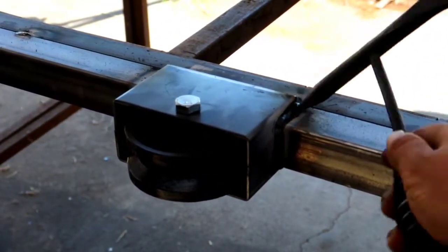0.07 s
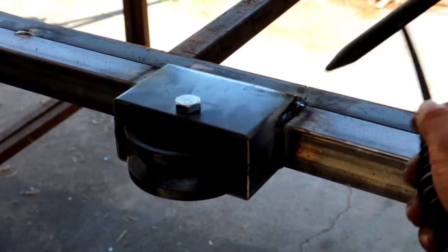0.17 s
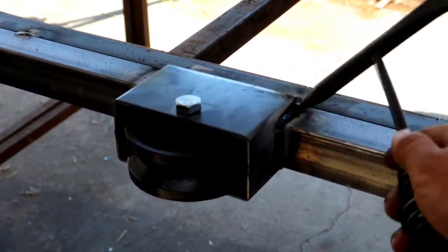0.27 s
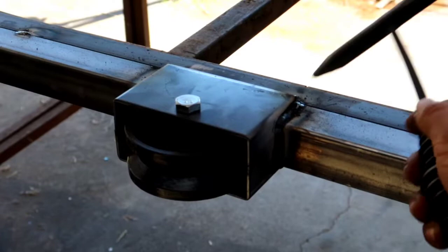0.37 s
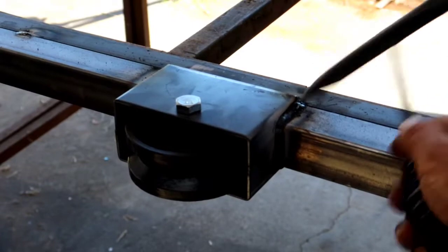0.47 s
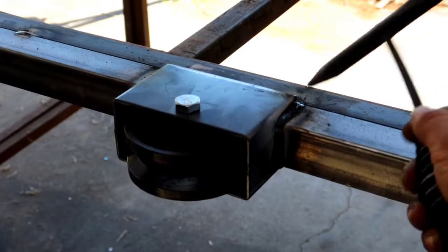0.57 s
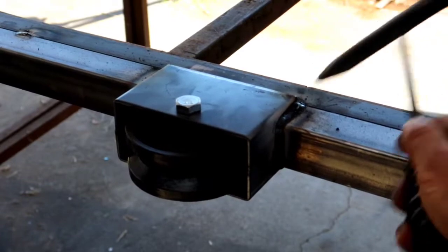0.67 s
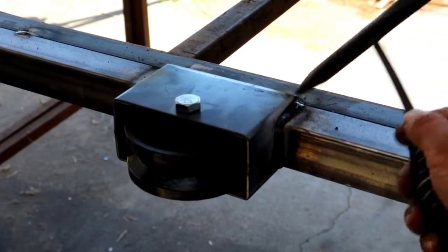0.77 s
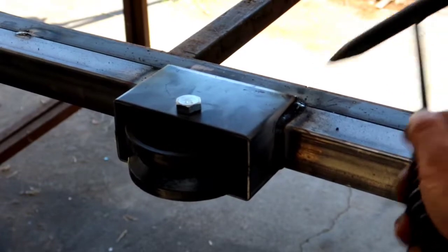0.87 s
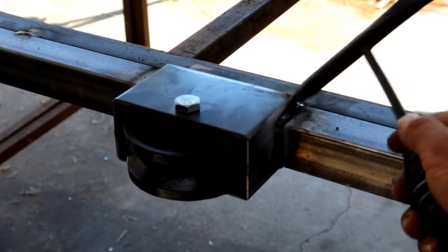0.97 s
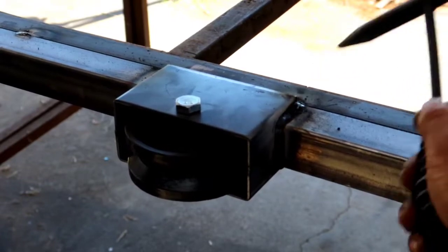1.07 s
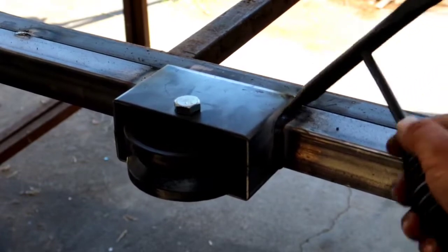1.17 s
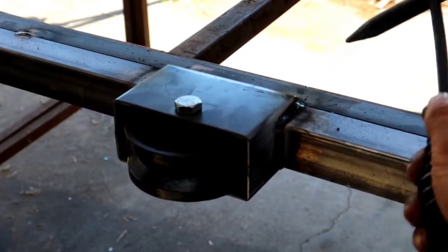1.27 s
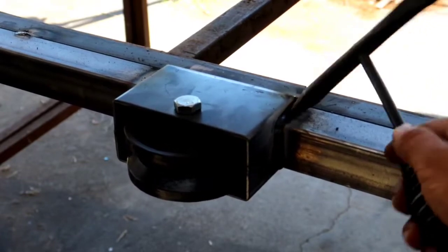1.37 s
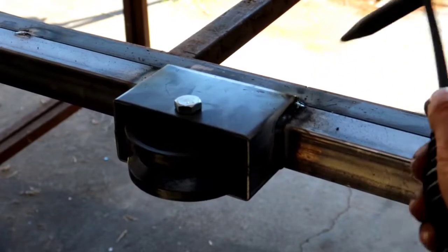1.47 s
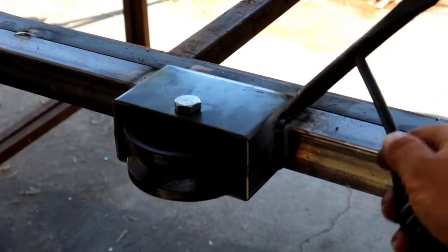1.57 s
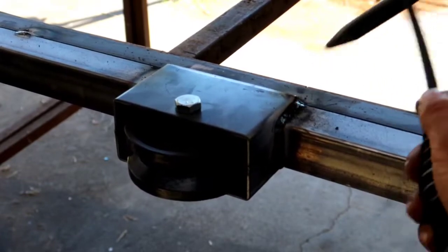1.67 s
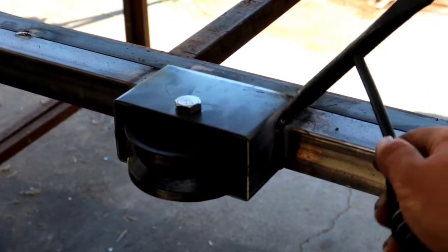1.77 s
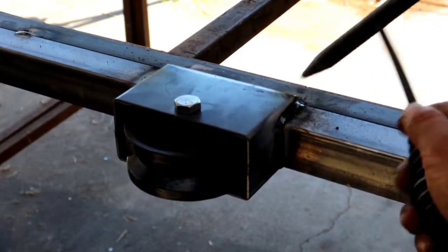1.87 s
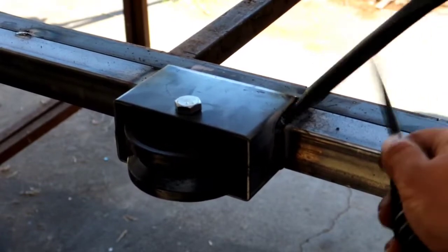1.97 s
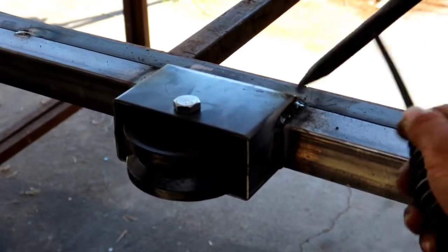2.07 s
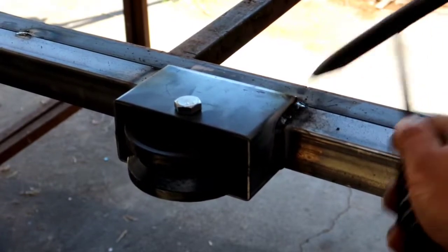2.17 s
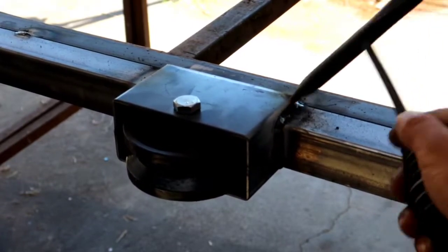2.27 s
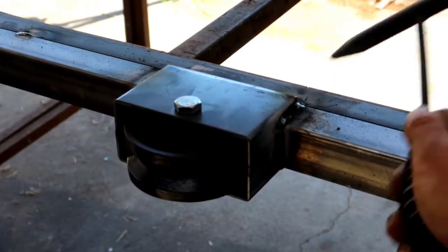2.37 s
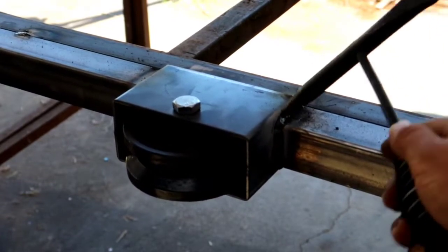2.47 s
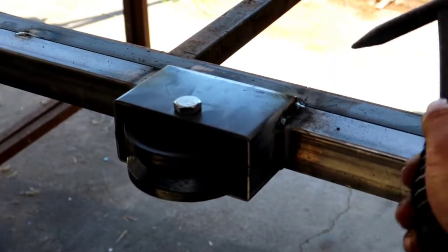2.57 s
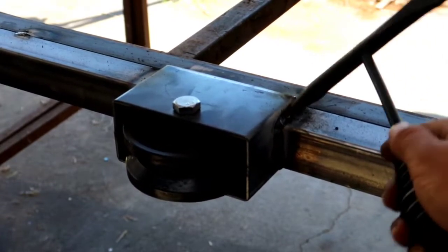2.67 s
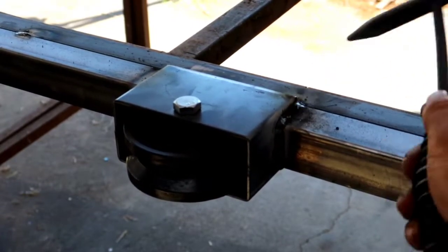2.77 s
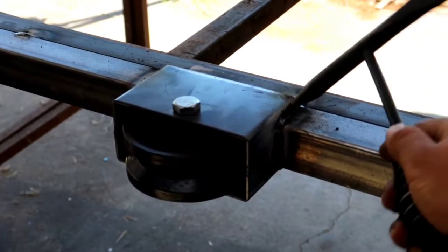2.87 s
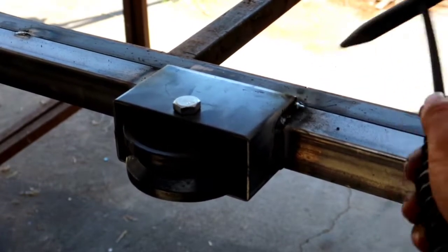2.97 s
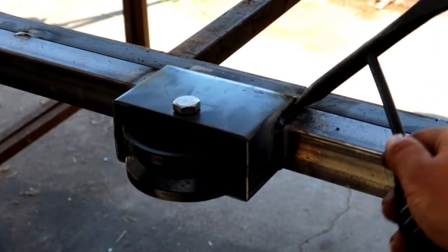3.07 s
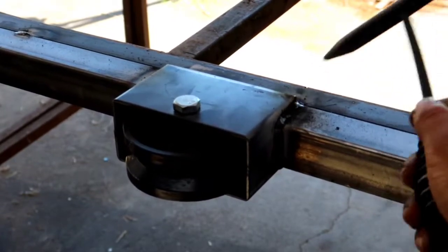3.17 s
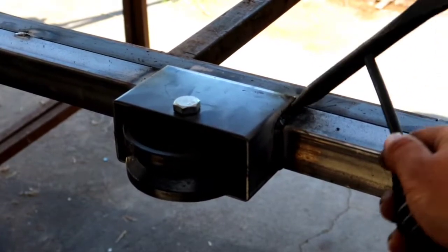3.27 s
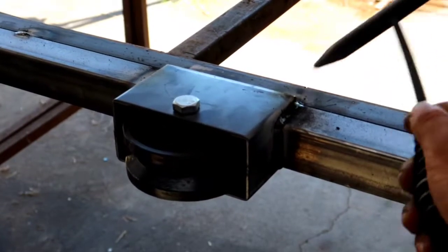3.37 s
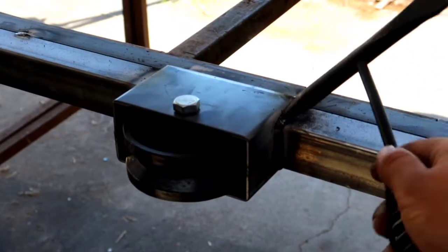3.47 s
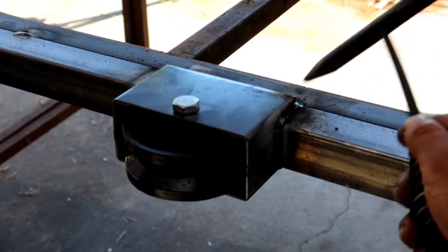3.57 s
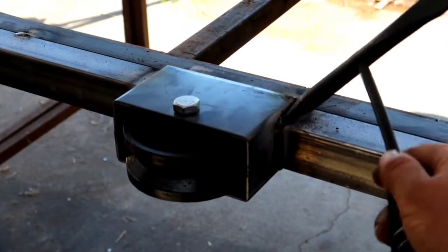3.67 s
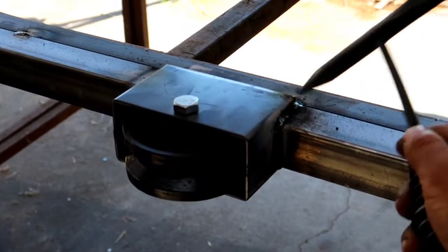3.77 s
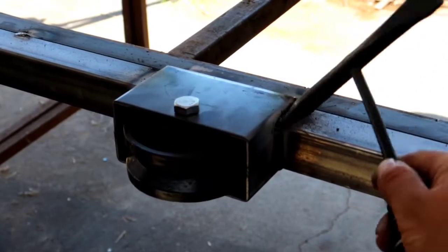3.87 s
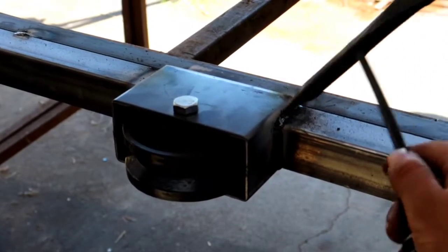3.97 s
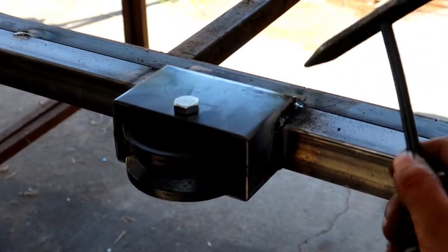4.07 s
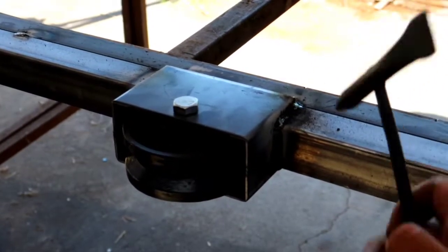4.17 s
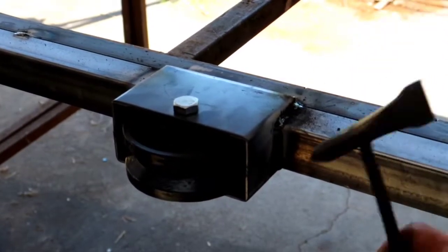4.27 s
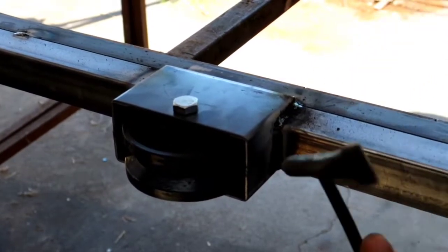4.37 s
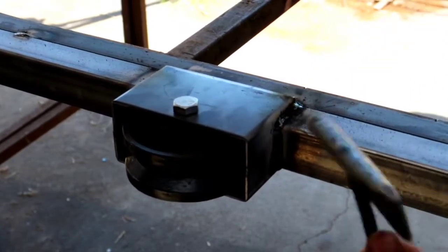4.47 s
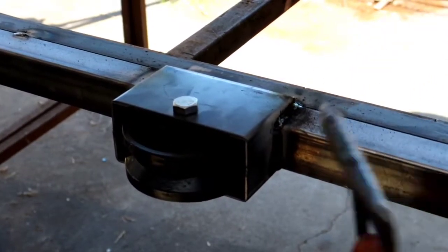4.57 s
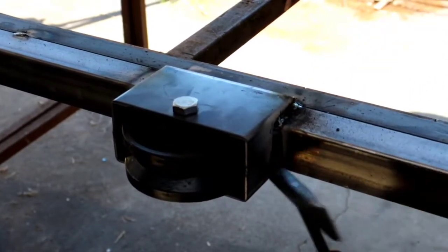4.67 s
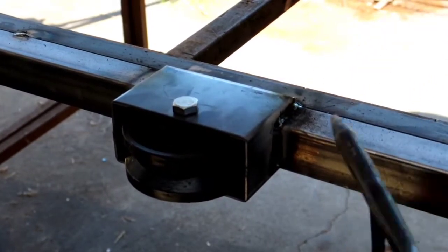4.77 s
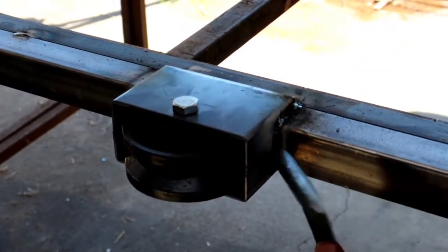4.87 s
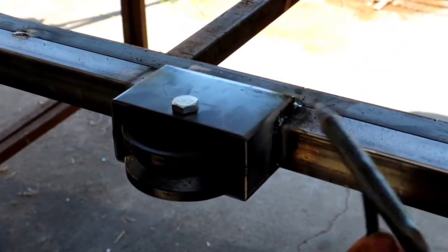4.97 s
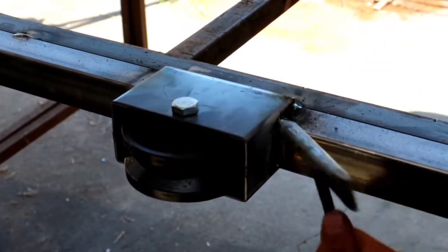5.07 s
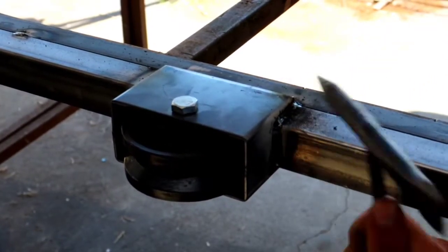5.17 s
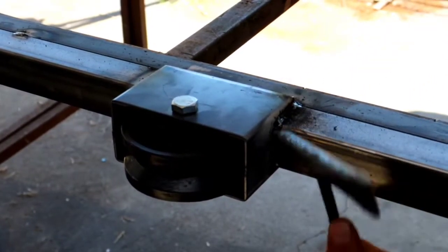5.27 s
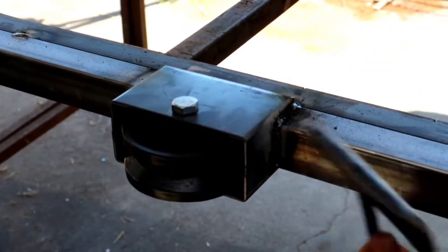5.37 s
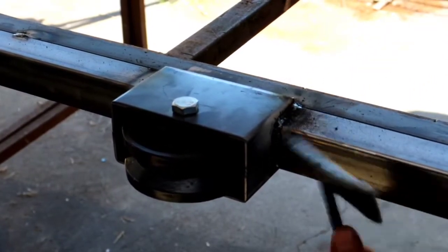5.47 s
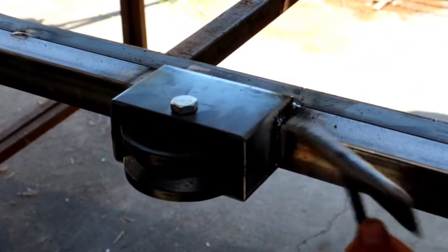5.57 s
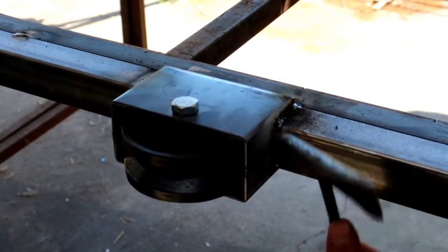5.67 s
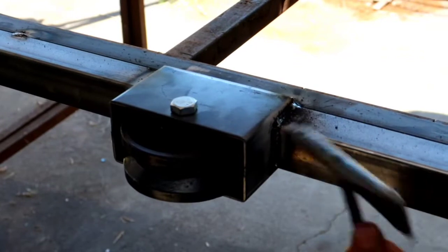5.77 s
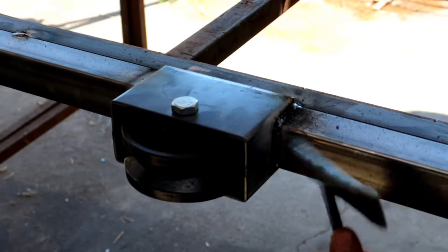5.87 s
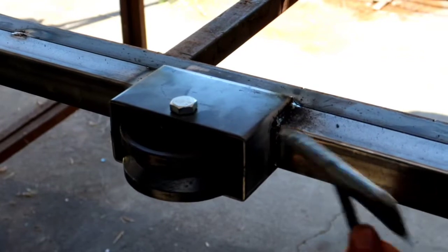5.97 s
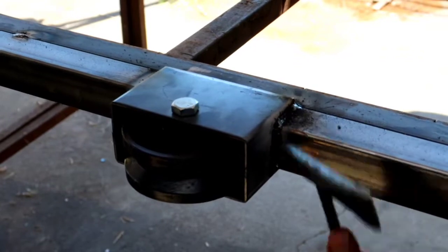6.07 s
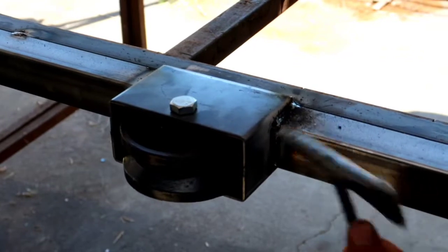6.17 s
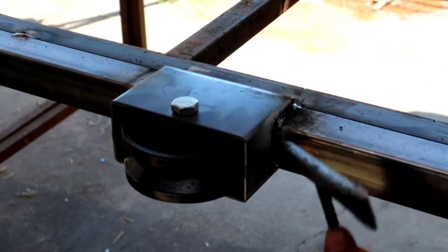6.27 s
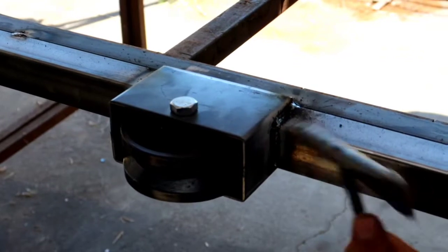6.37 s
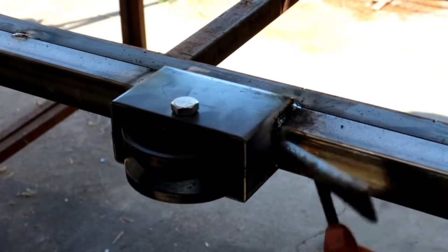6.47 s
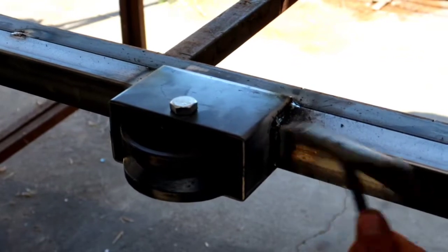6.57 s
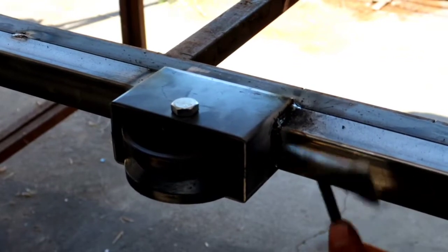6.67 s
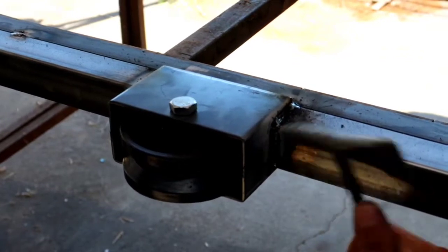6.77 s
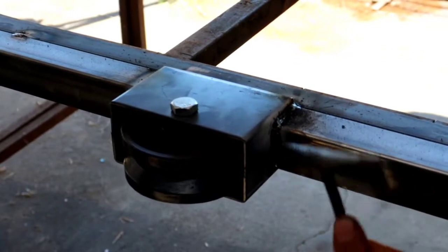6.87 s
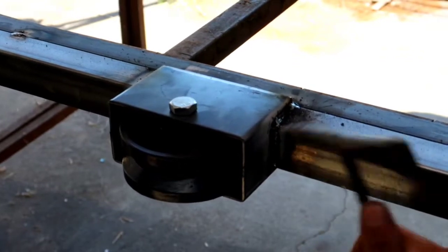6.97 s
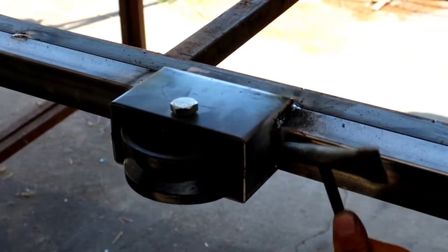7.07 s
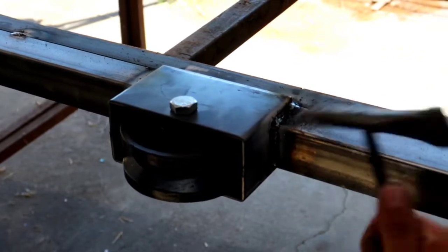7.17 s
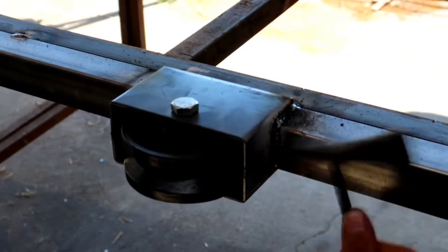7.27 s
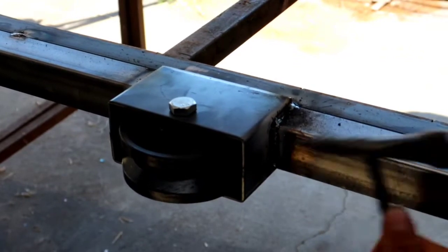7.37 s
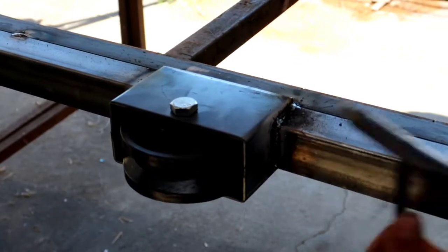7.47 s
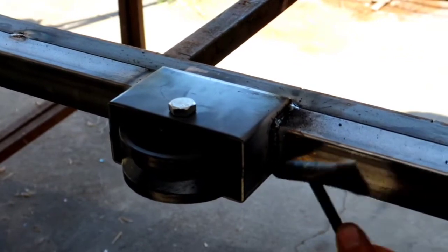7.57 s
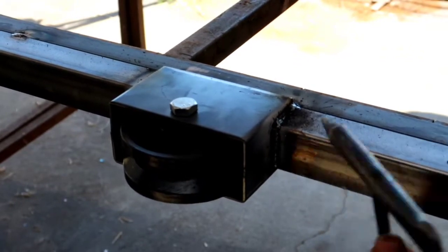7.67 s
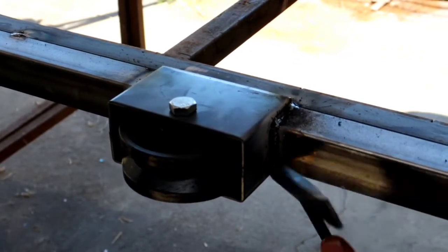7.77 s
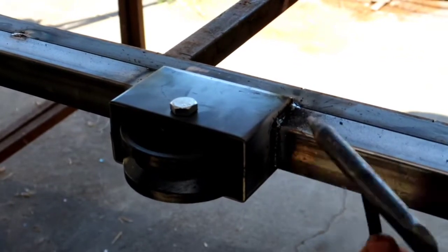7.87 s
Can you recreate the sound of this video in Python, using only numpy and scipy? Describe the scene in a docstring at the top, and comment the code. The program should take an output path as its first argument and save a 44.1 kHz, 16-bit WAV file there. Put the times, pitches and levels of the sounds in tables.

```python
"""A chipping hammer knocks slag off a weld on a frame of steel tube, about five blows a second:
first with its point, then, after a short pause to turn it, with its chisel edge.
Each blow is a hard clank of damped modes and crackling noise, a spray of slag ticks, then the clang
of the tube walls (decaying modes) and a dense ring (fading noise) over the low drone of the whole frame.
The recorder's gain ducks at the hardest blows and creeps back, taking the workshop's rumble with it."""
import sys
import numpy as np
from scipy import signal
from scipy.fft import rfft, irfft, next_fast_len
from scipy.io import wavfile
from scipy.ndimage import uniform_filter1d

SR = 44100
rng = np.random.default_rng(int(sys.argv[2]) if len(sys.argv) > 2 else 0)


def unload_wav(signal):
    """Save mono or channel-first audio to the path in sys.argv[1] as 16-bit WAV at rate SR, clipped to [-1, 1]."""
    wavfile.write(
        sys.argv[1],
        SR,
        np.round(np.clip(np.atleast_2d(signal).T, -1, 1) * 32767).astype(np.int16),
    )


N = 349713
LENGTH = SR * 3 // 4  # longest ring of one blow, samples
AGE = np.arange(LENGTH) / SR  # time since the contact, s
TURN_S = 4.4  # the hammer is turned from point to chisel

# hammer blows: (time [s], ring level [dB], clank level [dB], hardness of the contact [dB],
# extra level of the wall modes below 1 kHz at the struck spot [dB])
BLOWS = [(-0.045, -16.5, -26, -1, 6), (0.167, -14, -14, -4, 3.5), (0.3794, -14.5, -14, -5, 1),
         (0.5889, -17.5, -19, -0.5, -1), (0.7972, -15.5, -30.0, -2, 0.5), (1.006, -13, -12.5, -3, 1.5),
         (1.2222, -12.5, -9.5, 1, -1.5), (1.4347, -13, -21, -4.5, 0), (1.6529, -14.5, -9, -0.5, -4.5),
         (1.8684, -16.5, -29.5, 3, 0.5), (2.0852, -15.5, -16, -5, -1), (2.2976, -17, -35, 1, 3),
         (2.5126, -15.5, -35, 1, 3), (2.7345, -15.5, -18, -3.5, -2), (2.9424, -15.5, -19, -0.5, -0.5),
         (3.1536, -15, -13.5, -4.5, 1), (3.3594, -20.5, -38, 1.5, 9), (3.575, -15.5, -8.5, 6.5, -3),
         (3.7824, -16, -9.5, 6, -2), (3.9804, -22.5, -16.5, 1.5, 4), (4.729, -15.5, -26, -6.5, 1.5),
         (4.9532, -16.5, -15.5, -5.5, 0), (5.162, -15.5, -9, 4.5, 5), (5.384, -15.5, -11.5, -2, -1),
         (5.5936, -18, -12.5, -2.5, -5), (5.789, -13.5, -7, 3, -5.5), (5.9929, -15, -12, -1.5, -2.5),
         (6.19, -14.5, -6, 2, -2), (6.385, -17.5, -6.5, 2.5, -3), (6.5831, -16, -9.5, -2, -1.5),
         (6.79, -16.5, -14.5, -5.5, 10), (6.9881, -20, -17.5, -6.5, -2.5), (7.1821, -16, -13.5, -3, 0.5),
         (7.3949, -16.5, -22, -4.5, 2), (7.631, -16, -11.5, -5.5, 8), (7.8412, -16, -26, -4.5, -6.5)]
# stereo width of every noise and mode: (frequency [Hz], side minus mid [dB])
WIDTH = [(100, -19), (850, -22), (1400, -14), (2700, -12.5), (4200, -7), (6000, -2.5), (14000, -2.5)]


def amp(db):
    """dB to gain."""
    return 10 ** (np.asarray(db) / 20)


def unit(x, span=None):
    """Scale to rms 1 over the first span samples."""
    return x / np.sqrt(np.mean(x[..., :span] ** 2) + 1e-20)


def along(points, hz):
    """Read (frequency, value) points on a log frequency axis."""
    f, v = np.transpose(points)
    return np.interp(np.log(hz + 1), np.log(f + 1), v)


def filtered(x, response):
    """Apply a gain that depends on frequency."""
    n = x.shape[-1]
    m = next_fast_len(n + 4096)
    spectrum = rfft(x, m) * response(np.fft.rfftfreq(m, 1 / SR))
    return irfft(spectrum, m)[..., :n]


def noise(spectrum, size):
    """Coloured noise at two close microphones: alike in the bass, unrelated in the treble."""
    def response(hz):
        width = amp(along(WIDTH, hz))
        mid_side = np.array([np.ones_like(hz), width]) / np.hypot(1, width)
        return amp(along(spectrum, hz)) * mid_side
    mid, side = filtered(rng.standard_normal((2, size)), response)
    return unit(np.array([mid + side, mid - side]))


def add(track, sound, s):
    """Mix a sound into the track from time s on."""
    start = round(s * SR)
    first, last = max(start, 0), min(start + sound.shape[1], N)
    if last > first:
        track[:, first:last] += sound[:, first - start:last - start]


def hammer(slag_db=-15, thump_db=-17):
    """Every blow clanks, chips slag and rings the frame; a harder contact brightens clank and ring."""
    out = np.zeros((2, N))
    for s, ring_db, clank_db, hard_db, low_db in BLOWS:
        tip = int(s > TURN_S)  # 0 point, 1 chisel
        treble_db = -2.0 + 0.62 * hard_db
        add(out, amp(ring_db) * ring(tip, treble_db, low_db), s)
        add(out, amp(clank_db) * echoed(clank(tip, hard_db)), s)
        add(out, amp(clank_db + thump_db) * thump(), s)
        # bright blows break off the most
        add(out, amp(ring_db + slag_db + 1.2 * treble_db) * slag(), s)
    return out


def clank(tip, hard_db, crack_db=-5, crack_t60=.016, crush=.001):
    """The contact itself: slag is crushed with a crackle and the hammer head rings for a few cycles."""
    # heavily damped modes of the hammer head and the struck spot:
    # (frequency [Hz], t60 [s], level under the point [dB], level under the chisel [dB])
    head_modes = [(142.6, 0.035, -20.5, -27), (295, 0.048, -8, -10.5), (404, 0.05, -21, -11),
                  (708, 0.021, -21.5, -8), (960, 0.022, -28.5, -11), (1380, 0.027, -10, 5.5),
                  (1515, 0.0089, 12.5, 0), (1598, 0.031, -40, 5), (1890, 0.012, -8, 0),
                  (2400, 0.016, 7, -44), (2597, 0.024, 10, 3), (2840, 0.045, -24, -33.5),
                  (3070, 0.015, 1, 15), (3640, 0.024, -32.5, -65), (4560, 0.018, -16.5, -33),
                  (5100, 0.0089, -33.5, 7)]
    # steel breaking slag: (frequency [Hz], density [dB per Hz])
    crack_spectrum = [(100, -18.5), (600, 0.5), (1500, 2), (4500, -2), (7000, -5.5), (10000, -20.5),
                      (16000, -17.5)]
    # a harder contact is brighter: (frequency [Hz], gain [dB per dB of hardness])
    hardness_tilt = [(200, 0.9), (1300, -0.06), (2300, 1.5), (4500, 2.1)]
    # balance of the direct sound, to the right from about 1 to 7 kHz: (frequency [Hz], left minus right [dB])
    lean = [(500, 2), (850, 4), (1200, -6), (2000, -7), (3000, -3), (12000, 2)]
    size = SR // 16
    age = AGE[:size]
    head = modes(head_modes, tip, 0, scatter_db=1.5, beating=0, attack=0.00036, size=size)
    crack = noise(crack_spectrum, size) * amp(-60 * age / crack_t60) * (1 - np.exp(-age / crush))
    both = unit(head, SR // 200) + amp(crack_db) * unit(crack, SR // 200)

    def colour(hz):
        lean_db = along(lean, hz) * np.array([[.5], [-.5]])
        return amp(hard_db * along(hardness_tilt, hz) + lean_db)
    return unit(filtered(both, colour), SR // 200)


def ring(tip, treble_db, low_db, walls_db=-3.5, crowd_db=-2.5, spread=0.0012):
    """The frame's answer to one blow: clear wall modes over the dense ring."""
    # ringing modes of the tube frame:
    # (frequency [Hz], t60 [s], level under the point [dB], level under the chisel [dB])
    frame_modes = [(172, .15, -17, -27), (320, .15, -13, -20), (555, .5, -16, -16), (613, 1.1, -22, -28),
                   (715, .25, -15, -20), (828, .14, -5, 0), (849, .19, 0, 2.5), (870, .2, 1, 0),
                   (974, .25, -9, -17), (1180, .7, -17, -15), (1243, .22, -2, -10), (1287, .2, -6, -2.5),
                   (1410, .22, -5.5, -4), (1488, .25, -6, -12), (1514, .9, -16, -24), (1531, .22, -4, -9),
                   (1636, .2, -11, -6), (1968, .24, -6, -12), (2160, .24, -5.5, -14), (2282, .2, -14, -11),
                   (2572, .2, 0, -15), (2602, .22, 0, -13), (2638, .55, -7, -14), (2692, .45, -12, -9),
                   (2747, .25, -4, -14), (3215, .15, -8, -10), (3800, .28, -12, -14), (3994, .25, -12, -13),
                   (4332, .22, -12, -8.5), (4830, .14, -10, -12)]
    walls = modes(frame_modes, tip, low_db, scatter_db=1.0, beating=0.82, attack=0.0031, size=LENGTH)
    dense = crowd(tip) * (1 - np.exp(-AGE / spread))
    both = amp(walls_db) * unit(walls, SR // 20) + amp(crowd_db) * unit(dense, SR // 20)
    treble_share = [(2500, 0.02), (4500, 0.99), (9000, 0.65)]
    return filtered(both, lambda hz: amp(treble_db * along(treble_share, hz)))


def modes(table, tip, low_db, scatter_db, beating, attack, size):
    """Damped modes, struck at new strengths each time; near neighbours and echoes can make each one beat."""
    detune = .004  # each struck spot favours other members of a cluster: spread of pitch, as a share
    t, out = AGE[:size], np.zeros((2, size))
    for hz, t60, *tip_db in table:
        level = tip_db[tip] + scatter_db * rng.standard_normal() + low_db * (hz < 1000)
        hz = hz * (1 + detune * rng.standard_normal())
        # slow random change of strength and phase
        knots = rng.standard_normal((2, 48))
        knot_times = np.linspace(0, AGE[-1], knots.shape[1])
        waver = 1 + beating * np.interp(t, knot_times, knots[0] + 1j * knots[1])
        step = np.exp((2j * np.pi * hz - np.log(1000) / t60) / SR)
        wave = waver * np.cumprod(np.full(size, step))
        # opposite phase shifts left and right widen the mode
        shift = amp(along(WIDTH, hz)) * rng.standard_normal() * np.array([[1], [-1]])
        phase = 2 * np.pi * rng.random() + shift
        out += amp(level) * (wave * np.exp(1j * phase)).real
    return out * (1 - np.exp(-t / attack))


def crowd(tip, uneven_db_at_2k=3, build=0.015):
    """Countless weak modes and their room echoes merge into a noisy ring whose treble dies soonest."""
    # the frame's weak modes, one list for the point, one for the chisel: (frequency [Hz], density [dB per Hz])
    spectra = [
        [(40, -56), (130, -13.5), (400, -15.5), (700, -7), (1000, -1), (1500, -1.5), (2900, -2.5), (4000, -4),
         (5100, -6), (6000, -14), (6330, -9), (6800, -13), (8400, -18), (13500, -20.5), (16000, -36)],
        [(40, -49), (130, -20), (400, -12.5), (700, -6), (1000, -4.5), (1400, -2), (2000, -2.5), (3000, -2),
         (5200, -5), (6000, -11.5), (6330, -8), (6800, -12), (8400, -15), (13500, -20), (16000, -36)],
    ]
    # decay of frame and room together: (frequency [Hz], t60 [s])
    fade = [(100, 0.87), (400, 0.27), (850, 0.38), (1500, 0.38), (2700, 0.39), (5000, 0.33), (9000, 0.29),
            (15000, 0.19)]
    # each blow lands on a slightly different spot and favours other modes
    grid = np.linspace(0, np.sqrt(SR / 2), 260) ** 2
    favour_db = uneven_db_at_2k * rng.standard_normal(len(grid)) * np.minimum(grid / 2000, 1.3)
    struck = filtered(noise(spectra[tip], LENGTH), lambda hz: amp(np.interp(hz, grid, favour_db)))
    hz, t, z = signal.stft(struck, SR, nperseg=256)
    # arriving echoes hold the level up for a moment before it falls
    fall = t - build * (1 - np.exp(-t / build))
    faded = z * amp(-60 * fall / along(fade, hz)[:, None])
    return signal.istft(faded, SR, nperseg=256)[1][:, :LENGTH]


def slag(chips_per_s=1500, t60=0.21, rise=0.0056, size_db=4.0):
    """Brittle slag splinters off in a brief spray of tiny ticks of random size."""
    # colour of the ticks: (frequency [Hz], density [dB per Hz])
    spectrum = [(1500, -35), (3500, 0), (5000, 9), (6200, -11.5), (9500, -2.5), (14000, -22), (16000, -21)]
    size = SR // 5
    age = AGE[:size]
    breaks = rng.random(size) < chips_per_s / SR
    ticks = breaks * amp(size_db * rng.standard_normal(size)) * rng.standard_normal((2, size))
    spray = ticks * amp(-60 * age / t60) * (1 - np.exp(-age / rise))
    return unit(filtered(spray, lambda hz: amp(along(spectrum, hz))), SR // 20)


def thump(size=SR // 10, t60=0.027, attack=.001):
    """The contact also shoves the whole frame: a short, dull burst of noise."""
    # colour of that shove: (frequency [Hz], density [dB per Hz])
    spectrum = [(30, -8), (90, 0), (250, 1), (500, -14), (1200, -45.5)]
    age = AGE[:size]
    return noise(spectrum, size) * amp(-60 * age / t60) * (1 - np.exp(-age / attack))


def echoed(x, size=SR // 7, echo_db=-6.5, t60=0.14, delay_s=.005):
    """A sound followed by its scattered reflections from floor and steelwork nearby."""
    age = AGE[:size]
    tail = noise([(100, 0), (16000, 0)], size) * amp(-60 * age / t60) * (age > delay_s)
    direct = age == 0
    answer = amp(echo_db) * tail / np.linalg.norm(tail[0]) + direct
    return signal.fftconvolve(x, answer, axes=-1)


def drone(under_ring_db=-18.5, chisel_db=-4.5, t60=1.55, attack=0.0092):
    """The long members of the frame shudder on, low and dull; every blow tops the shudder up."""
    # colour of the drone: (frequency [Hz], density [dB per Hz])
    spectrum = [(50, -30), (140, -3), (380, 0.5), (600, -1), (1500, -3), (2500, -16), (4000, -37),
                (8000, -77)]
    t, power = np.arange(2 * SR) / SR, np.zeros((1, N))
    fading = amp(-60 * t / t60) * (1 - np.exp(-t / attack))
    for s, ring_db, *_ in BLOWS:
        level_db = ring_db + under_ring_db + chisel_db * (s > TURN_S)
        add(power, (amp(level_db) * fading[None]) ** 2, s)
    return np.sqrt(power) * noise(spectrum, N)


def scuff(s=7.565, half_length=.04, db=-40):
    """A soft, low scuff between two of the last blows: a smooth swell of dull noise."""
    # colour of the scuff: (frequency [Hz], density [dB per Hz])
    spectrum = [(70, -35), (160, 4), (220, -1), (310, 2), (450, -14), (900, -30), (2000, -70)]
    swell = np.exp(-((np.arange(N) / SR - s) / half_length) ** 2)
    return amp(db) * swell * noise(spectrum, N)


def workshop(rumble_db=-50, air_db=-50, fade_db_per_s=1.04):
    """A low rumble that slowly dies down and swells now and then, over the still air."""
    # soft swells of the rumble: (time [s], half length [s], level [dB])
    swells = [(0.06, .1, 5), (1.0, 0.37, 2), (3.07, .12, 7), (4.87, .11, 8), (5.6, .35, 3)]
    # colour of the rumble: (frequency [Hz], density [dB per Hz])
    rumble_spectrum = [(15, -23.5), (28, 2.5), (45, -0.5), (62, 2), (85, 5.5), (130, -9.5), (250, -28.5),
                       (600, -54.5)]
    # the still air of the shop: (frequency [Hz], density [dB per Hz])
    air_spectrum = [(60, -12), (100, 0), (150, -7), (420, -3), (520, -11), (900, -11), (2400, -21),
                    (4500, -34), (8000, -42), (16000, -46)]
    t = np.arange(N) / SR
    swell_db = sum(db * np.exp(-((t - s) / half_length) ** 2) for s, half_length, db in swells)
    rumble = amp(rumble_db + swell_db - fade_db_per_s * t) * noise(rumble_spectrum, N)
    return rumble + amp(air_db) * noise(air_spectrum, N)


def scene():
    """The hammering, close by, over the workshop's background."""
    return hammer() + drone() + workshop() + scuff()


def trailing(x, s):
    """Mean of the last s seconds."""
    size = max(round(s * SR), 1)
    return uniform_filter1d(x, size, origin=(size - 1) // 2, mode="constant")


def gain_control(x, above_db=-12, slope=1.0, recover_db_per_s=4, attack_s=.018, sense_s=0.0049):
    """The gain soon drops by what a blow exceeds the threshold, then climbs back at a steady rate."""
    power = trailing(np.mean(x ** 2, axis=0), sense_s)
    level_db = 10 * np.log10(np.abs(power) + 1e-12)
    over_db = slope * np.maximum(level_db - above_db, 0)
    # a running maximum against a rising line holds each drop and releases it steadily
    climb_db = recover_db_per_s * np.arange(N) / SR
    duck_db = np.maximum.accumulate(over_db + climb_db) - climb_db
    return x * amp(-trailing(duck_db, attack_s))


def record(dry, top_hz=15900):
    """The recorder rides its gain, rounds off the hardest peaks and cuts steeply above its band limit."""
    held = gain_control(dry)
    rounded = held / (1 + np.abs(held) ** 6) ** (1 / 6)
    return filtered(rounded, lambda hz: 1 / (1 + (hz / top_hz) ** 120))


dry = scene()
out = record(dry)
unload_wav(out)
```